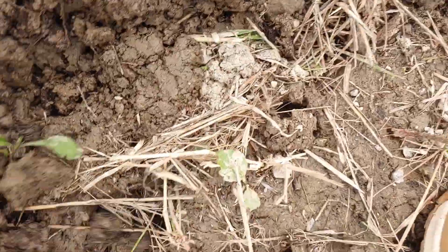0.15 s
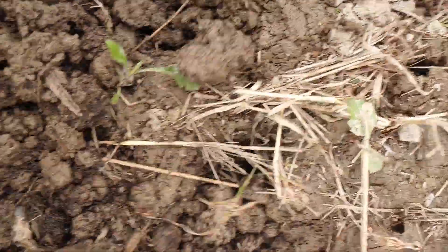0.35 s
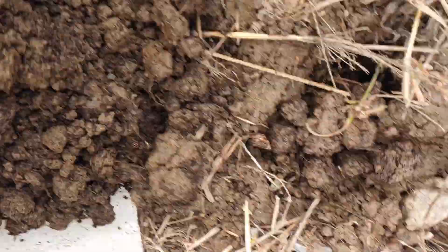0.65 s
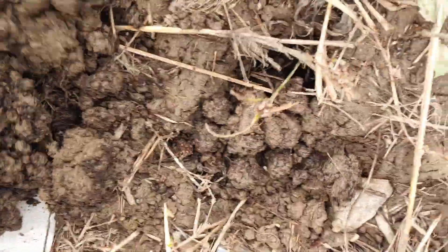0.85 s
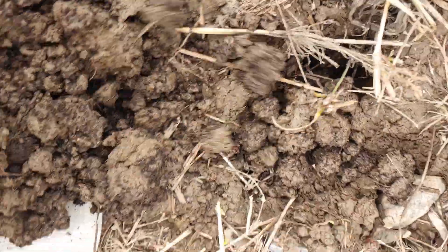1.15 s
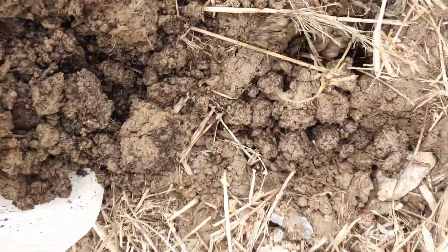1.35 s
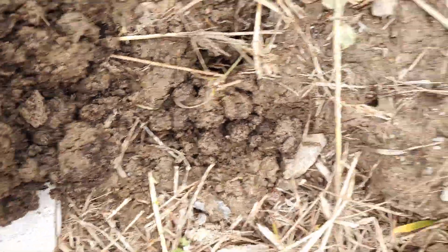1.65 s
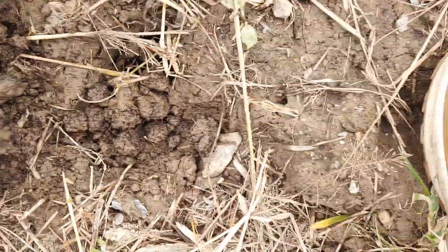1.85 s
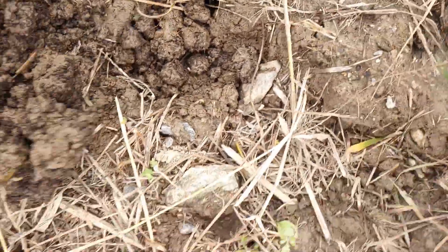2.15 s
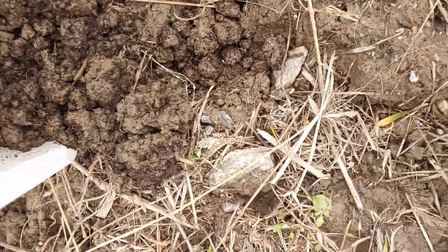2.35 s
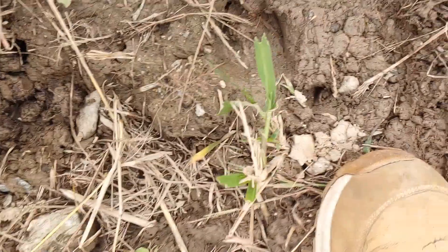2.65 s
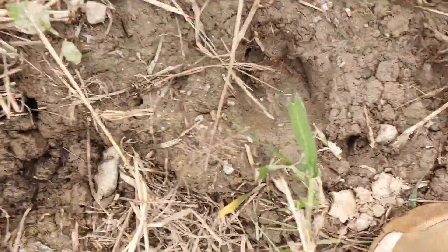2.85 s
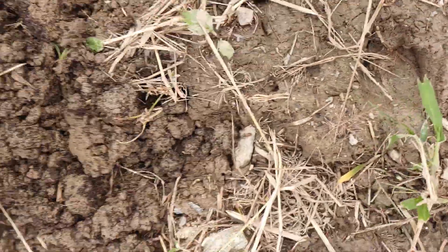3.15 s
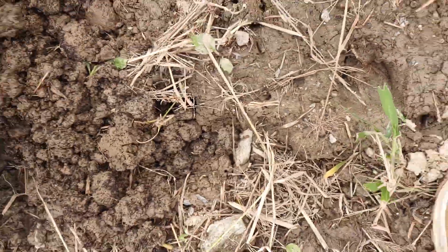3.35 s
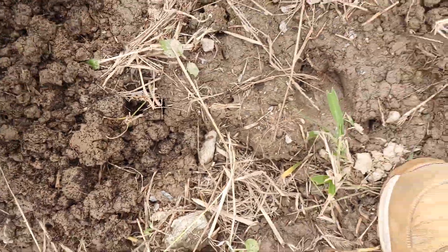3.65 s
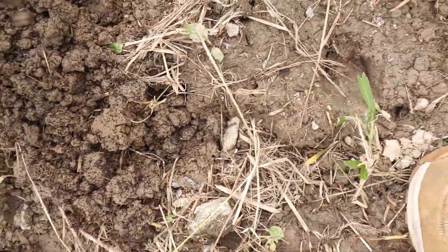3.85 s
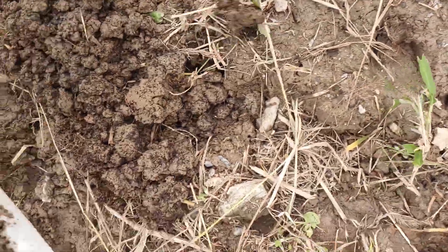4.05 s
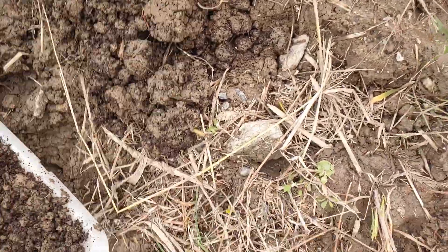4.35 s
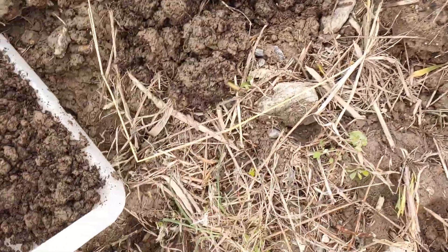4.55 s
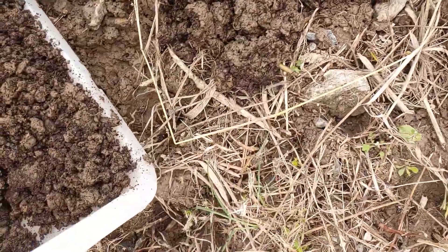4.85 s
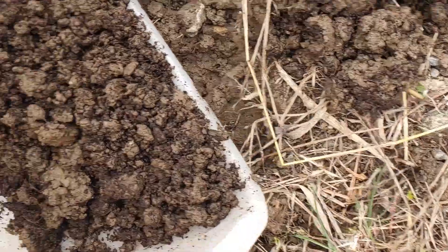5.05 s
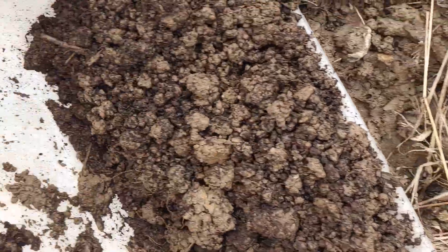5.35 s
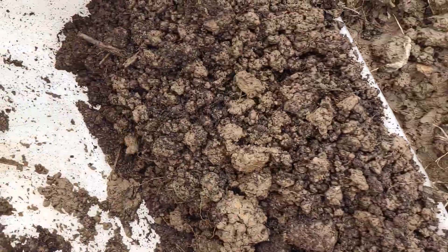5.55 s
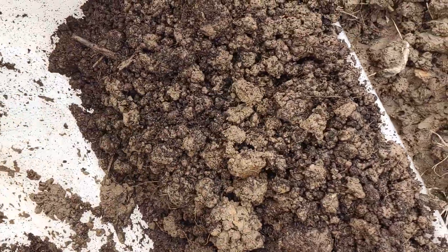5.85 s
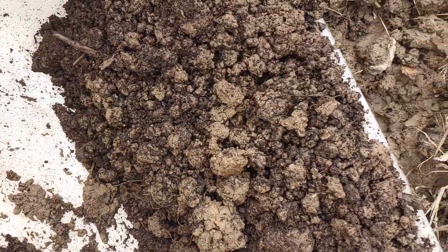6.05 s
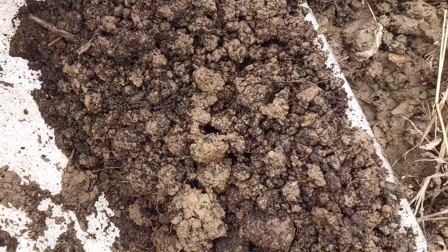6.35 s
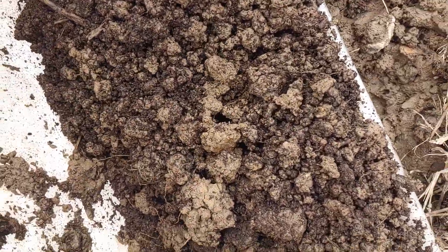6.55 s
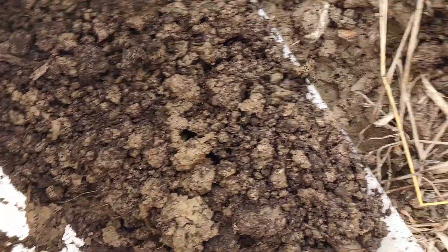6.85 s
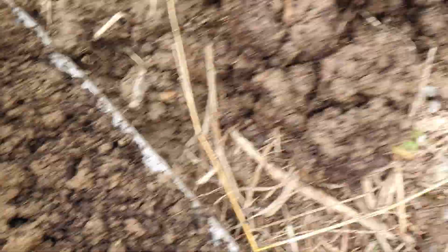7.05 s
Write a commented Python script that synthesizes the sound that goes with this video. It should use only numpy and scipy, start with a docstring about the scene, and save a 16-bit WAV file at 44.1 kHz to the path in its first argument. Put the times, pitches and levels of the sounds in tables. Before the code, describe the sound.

Soil is dug close to the microphone in an open field, over a faint hiss of air and insects. From the start, dry straw rustles in short irregular strokes, earth crumbles in tiny clicks and stalks snap. Clods land with low, dull thuds, loudest in a cluster around 1.4 seconds, and a foam tray nearby adds a slight hollow ring. A strong rustle comes at about 2.2 seconds and a sharp crack with a thump at 2.6. From 3 to 5.5 seconds the digging is lighter, with scattered scrapes, ticks and soft thuds. A small bird twitters faintly, far off to the right, from about 2.3 to 5.4 seconds. Cicadas drone thin and high, in turns, from 4 to about 6.4 seconds. Earth crumbles again from 5.5 seconds, with a few more thuds and straw crackles between 6.3 and 7.

```python
"""Digging in dry straw

Clods of soil are dug and tipped close by in a field, beside a foam tray that rings along.
Straw rustles and earth crumbles in showers of tiny clicks, stalks and clods crack, and lumps land
with low, sagging thuds. A small bird twitters far off to the right, and cicadas drone in turns,
their clicking membranes ringing a narrow body. A faint hiss of air and insects lies under it all."""
import sys
import numpy as np
from scipy import signal
from scipy.fft import rfft, irfft, next_fast_len
from scipy.io import wavfile
from scipy.ndimage import uniform_filter1d

SR = 44100
rng = np.random.default_rng(int(sys.argv[2]) if len(sys.argv) > 2 else 0)


def wav_record(signal):
    """Record a signal, one row per channel, as 16-bit PCM in the file named by sys.argv[1]."""
    frames = np.transpose(np.atleast_2d(signal))
    bounded = np.clip(frames, -1, 1)
    # unit amplitude maps onto the largest positive 16-bit level
    quanta = np.round(bounded * 32767).astype(np.int16)
    wavfile.write(sys.argv[1], SR, quanta)


N = 317515

# Tone curves of the background bed and the three digging textures. Each row: frequency in Hz, gain in dB.
FIELD_TONE = [(15, -61), (40, -2.5), (190, -15.5), (1300, -25.5), (2800, -30), (4000, -17), (5200, -29),
              (7300, -13), (9500, -33.5), (16000, -39)]
STRAW_TONE = [(1200, -23.5), (3200, 2.5), (5500, -1.5), (7300, 5.5), (10000, -7), (16000, -23)]
SOIL_TONE = [(150, -39), (300, -7.5), (750, -7), (1100, -4), (1900, -8), (4500, -45.5)]
GROUND_TONE = [(12, -30.5), (40, 4.5), (110, -3), (210, 2), (400, -22.5), (900, -55.5)]
# Digging strokes. Each row: middle in seconds, length in seconds, level in dB, straw over soil in dB.
STROKES = [(0.046, 0.27, -44.5, 4), (0.165, 0.12, -43, 16), (0.256, 0.22, -49, 5.5),
           (0.479, 0.26, -46.5, 10), (0.7, 0.15, -35.5, -0.5), (0.879, 0.17, -39.5, 0),
           (0.968, 0.065, -36, 1), (1.082, 0.13, -33, -2), (1.31, 0.11, -37.5, 4), (1.415, 0.093, -38.5, 4),
           (1.62, 0.19, -47, -11), (1.711, 0.11, -46, -3.5), (2.038, 0.22, -38.5, 0),
           (2.213, 0.12, -29.5, 7.5), (2.408, 0.2, -54.5, 7), (2.515, 0.16, -37, -2.5),
           (2.712, 0.18, -45.5, -0.5), (2.941, 0.08, -53, 4), (3.384, 0.17, -51.5, -1),
           (3.544, 0.062, -41.5, -2), (3.836, 0.035, -45.5, 1.5), (4.059, 0.049, -68, 32),
           (4.415, 0.079, -40, 8), (5.109, 0.19, -54, -5.5), (5.426, 0.16, -48.5, -6),
           (5.666, 0.15, -39, -6), (5.809, 0.08, -37.5, -9), (5.954, 0.075, -41, -6),
           (6.054, 0.046, -42.5, -1.5), (6.376, 0.042, -39.5, -19), (6.543, 0.18, -47, -3.5),
           (6.764, 0.23, -44, 6), (7.063, 0.15, -71, 24)]
# How much a stroke shakes the ground. Each row: time in seconds, rumble over soil in dB.
STROKE_DEPTH = [(0, 3), (2.0, 6.5), (2.22, -9), (5.13, -4.5), (5.45, -21)]
# The hollow of the foam tray. Each row: resonance in Hz, width in Hz, gain in dB.
TRAY_MODES = [(333, 450, 0), (721, 43, 5), (1057, 110, -3.5), (1500, 180, -4)]
# Stalks break high, clods low. Each row: time in seconds, level in dB, pitch in Hz.
SNAPS = [(0.179, -11.5, 6870), (0.2, -20.5, 7440), (0.348, -30, 7900), (0.37, -21, 7400),
         (0.551, -24, 5300), (0.5615, -8, 7460), (0.604, -31, 1500), (0.833, -27.5, 910),
         (0.9235, -25, 3200), (0.955, -30.5, 920), (1.191, -31, 1320), (1.2841, -18, 7500),
         (1.4162, -12, 1460), (1.4476, -18.5, 1690), (1.732, -26, 725), (1.9506, -23.5, 8000),
         (1.967, -19, 7900), (2.0805, -12, 1800), (2.1315, -16, 7200), (2.217, -14, 8600),
         (2.357, -37, 1030), (2.545, -36, 1500), (2.636, -8, 1800), (2.644, -10, 7070), (2.6505, -29, 6940),
         (2.699, -38.5, 2900), (3.398, -29.5, 1392), (3.554, -37, 1100), (3.8381, -31, 2170),
         (4.046, -30.5, 6600), (4.346, -39, 1003), (4.4019, -24, 3470), (4.413, -20, 3360),
         (4.5065, -37.5, 1240), (4.647, -39.5, 1330), (4.7, -43, 1090), (4.808, -52.5, 820),
         (4.9254, -38.5, 1260), (5.079, -41, 1230), (5.636, -32.5, 1500), (6.054, -36, 1330),
         (6.1514, -19, 7380), (6.347, -42, 1300), (6.365, -35.5, 800), (6.386, -37, 1100),
         (6.4744, -25.5, 1500), (6.537, -38.5, 1270), (6.714, -31, 3360), (6.772, -26, 6560),
         (6.973, -44.5, 1310), (7.0168, -27.5, 4240), (7.086, -37, 3930), (7.108, -34.5, 4440)]
# Lumps landing. Each row: start in seconds, level in dB, pitch in Hz, seconds to fade by 60 dB.
THUDS = [(0.287, -26.5, 111, 0.14), (0.336, -20, 122, 0.23), (0.512, -24, 58, 0.14),
         (0.892, -17, 158, 0.16), (0.968, -18.5, 128, 0.1), (1.205, -16.5, 128, 0.095),
         (1.348, -6.5, 143.4, 0.18), (1.37, -14.5, 177, 0.23), (1.401, -2.5, 90, 0.11),
         (1.436, -2, 117, 0.094), (1.641, -22, 180, 0.036), (2.004, -17, 93, 0.079),
         (2.075, -13.5, 90, 0.072), (2.205, -16, 170.4, 0.066), (2.423, -28, 134, 0.1),
         (2.635, -1, 168, 0.076), (2.929, -31.5, 158.6, 0.18), (3.81, -34.5, 208, 0.11),
         (3.834, -32, 417, 0.094), (3.909, -22.5, 98.7, 0.15), (4.414, -29, 306, 0.099),
         (4.447, -39, 43.7, 0.41), (4.647, -30.5, 172, 0.078), (4.897, -40.5, 259, 0.11),
         (5.13, -35.5, 146, 0.17), (5.188, -30, 95.4, 0.096), (5.575, -30.5, 78.4, 0.35),
         (6.363, -16.5, 182, 0.094), (6.472, -13, 116.5, 0.11), (6.79, -23, 203, 0.1),
         (6.847, -24, 140.3, 0.16)]
# Runs of bird notes. Each row: start in seconds, end in seconds, level in dB.
TWITTERS = [(2.284, 2.56, -50), (3.29, 3.36, -57), (3.5, 3.9, -56), (4.16, 4.29, -61.5), (4.575, 4.91, -60),
            (5.022, 5.09, -57)]
# The bird's steady notes. Each row: start in seconds, length in seconds, level in dB, pitch in Hz.
HELD_NOTES = [(3.161, 0.13, -63.5, 4070), (5.297, 0.074, -51.5, 3800)]
# Cicada calls. Each row: start in seconds, end in seconds, level in dB, pitch in Hz.
CICADA_CALLS = [(3.999, 4.549, -52, 7850), (4.495, 5.501, -51, 7430), (5.901, 6.354, -59.5, 7840)]
# Where the digging lies. Each row: time in seconds, left over right in dB.
DIGGING_PAN = [(1.9, -4.5), (2.3, -5), (3.39, -6), (3.602, -5.5), (6.9, -3.5), (7.019, -16.5)]
# Stereo tilt on top of that pan. Each row: frequency in Hz, left over right in dB.
STEREO_TILT = [(100, 12.5), (700, 9.5), (2500, 0.5), (8000, 10), (14000, 23.5)]


def amp(db):
    return 10 ** (np.asarray(db) / 20)


def unit_rms(x):
    return x / np.sqrt(np.mean(x ** 2) + 1e-20)


def equalise(x, curve):
    """Shapes the tone with (Hz, dB) points joined on a log axis."""
    points_hz, db = np.transpose(curve)
    size = next_fast_len(N)
    hz = np.fft.rfftfreq(size, 1 / SR)
    gain = amp(np.interp(np.log(hz + 1), np.log(points_hz + 1), db))
    return irfft(rfft(x, size) * gain, size)[..., :N]


def add(mix, start, sound, pan_db=0):
    """Lays a sound into the mix; a positive pan leans left."""
    part = mix[:, round(start * SR):][:, :sound.shape[-1]]
    part += sound[..., :part.shape[1]] * amp([[pan_db / 2], [-pan_db / 2]])


def resonate(x, hz, width_hz):
    """A resonance: shifts the pitch down to zero, smooths, and shifts back."""
    turn = np.exp(2j * np.pi * np.cumsum(np.full(len(x), hz)) / SR)
    pole = np.exp(-np.pi * width_hz / SR)
    return 2 * (turn * signal.lfilter([1 - pole], [1, -pole], x / turn + 1e-18)).real


def drift(seconds, count=1):
    """Random curves that wander on the given time scale."""
    steps = rng.standard_normal((count, N // 64 + 2))
    slow = unit_rms(uniform_filter1d(steps, max(int(seconds * SR / 64), 2), axis=1))
    return np.repeat(slow, 64, axis=1)[:, :N]


def field_bed():
    """Distant insects, air and microphone hiss, wavering slightly."""
    level_db = -60 + 2.5 * drift(0.068)
    return amp(level_db) * unit_rms(equalise(rng.standard_normal((2, N)), FIELD_TONE))


def grains(tone, per_s, spread_db, band_hz, q, clump_db, clump_s, spell_db, spell_s, shared):
    """Clumps of clicks ring bits of many pitches; each pitch has its own loud and quiet spells."""
    pitches = np.geomspace(*band_hz, 24)
    sizes = amp(spread_db * np.minimum(rng.exponential(1, (2, N)), 4))
    clicks = sizes * rng.choice([-1, 1], (2, N)) * (rng.random((2, N)) < per_s / SR)
    bit = rng.integers(0, len(pitches), (2, N))
    spells = np.take_along_axis(drift(spell_s, len(pitches)), bit, axis=0)
    clicks *= amp(spell_db * spells + clump_db * drift(clump_s))
    left, other = sum(signal.lfilter(*signal.iirpeak(hz, q, SR), clicks * (bit == k))
                      for k, hz in enumerate(pitches))
    right = shared * left + np.sqrt(1 - shared ** 2) * other
    return unit_rms(equalise(np.array([left, right]), tone))


def digging():
    """Each stroke swells and fades; straw, soil and ground answer it with their own grain."""
    straw = grains(STRAW_TONE, per_s=16000, spread_db=1.7, band_hz=(1200, 14300), q=24,
                   clump_db=2.8, clump_s=0.012, spell_db=5.5, spell_s=0.05, shared=0.1)
    soil = grains(SOIL_TONE, per_s=8000, spread_db=2.5, band_hz=(300, 4500), q=18,
                  clump_db=3.6, clump_s=0.016, spell_db=6, spell_s=0.05, shared=0.5)
    soil = unit_rms(soil + 0.65 * np.array([foam_tray(side) for side in soil]))
    ground = grains(GROUND_TONE, per_s=400, spread_db=1.7, band_hz=(31, 400), q=3.5,
                    clump_db=4.8, clump_s=0.03, spell_db=7.04, spell_s=0.058, shared=0.96)
    t = np.arange(0, N + 64, 64) / SR
    middle, length, soil_db, straw_db = np.transpose(STROKES)
    swells = np.exp(-abs((t[:, None] - middle) / (0.33 * length)) ** 1.88)
    ground_db = soil_db + np.interp(middle, *np.transpose(STROKE_DEPTH))
    # The ground rumbles on after each thud, softer and longer than the blow.
    landed, thud_db, _, t60 = np.transpose(THUDS)
    age = t[:, None] - landed
    tails = (age > 0) * amp(-60 * abs(age) / (2.18 * t60))
    straw_power = swells @ amp(soil_db + straw_db) ** 2
    soil_power = swells @ amp(soil_db) ** 2
    ground_power = swells @ amp(ground_db) ** 2 + tails ** 2 @ amp(thud_db - 14) ** 2
    layers = (straw, straw_power), (soil, soil_power), (ground, ground_power)
    return sum(layer * np.interp(np.arange(N) / SR, t, np.sqrt(power)) for layer, power in layers)


def foam_tray(x):
    """The tray rings along with whatever scrapes or strikes near it."""
    return sum(amp(db) * resonate(x, hz, width) for hz, width, db in TRAY_MODES)


def snaps():
    """A stalk or clod strains, then breaks: a sharp crack, a short ring and a dull knock."""
    mix, t = np.zeros((2, N)), np.arange(-400, 2200) / SR
    strain = np.where(t < 0, 0.7 * np.exp(t / 0.001) + 0.07 * np.exp(t / 0.006), 1)
    for time, db, hz in SNAPS:
        octaves = np.log2(hz / 1000)
        age = np.maximum(t, 0) / 1.354 ** octaves  # clods crack short, stalks splinter longer
        decay = np.exp(-age / 0.0015) + 0.12 * np.exp(-age / 0.005)
        noise = rng.standard_normal((3, len(t)))
        crack = (noise[0] + 1.6 * noise[:2]) * strain * decay
        ring = np.array([resonate(side, hz, width_hz=610) for side in crack])
        ring += 0.3 * signal.lfilter(*signal.iirpeak(hz, 0.8, SR), crack)
        knock = foam_tray(noise[2] * (t > 0) * np.exp(-age / 0.009))
        knock_db = -8 - 18 * octaves  # higher breaks knock less
        snap = ring / abs(ring).max() + amp(knock_db) * knock / abs(knock).max()
        snap[1] = np.roll(snap[1], rng.integers(-7, 6))  # each spot has its own stereo delay
        add(mix, time + t[0], amp(db) * snap)
    return equalise(mix, [(300, 8.5), (8000, 7.0), (16000, -18.5)])


def thuds():
    """A lump lands on soft earth: a damped swing that sags in pitch, and a rough burst as it breaks."""
    mix, t = np.zeros((2, N)), np.arange(SR // 3) / SR
    sag = 0.0036 * (1 - np.exp(-t / 0.0058))
    for start, db, hz, t60 in THUDS:
        swing = np.sin(2 * np.pi * hz * (t + sag)) * amp(-60 * t / t60)
        # The ground below answers lower and longer.
        deep = 0.28 * np.sin(2 * np.pi * 0.61 * hz * t) * amp(-35 * t / t60)
        noise = rng.standard_normal(len(t))
        grit = resonate(resonate(noise, 2.1 * hz, 330), 2.1 * hz, 330)
        burst = 0.39 * unit_rms(grit) * np.exp(-t / 0.0089)
        attack = 1 - np.exp(-(t / (0.044 * t60)) ** 2)
        add(mix, start, amp(db) * attack * (swing + deep + burst))
    return mix


def bird():
    """Runs of faint falling whistles, no two alike, and a few steady notes, blurred by distance."""
    mix, gap_s = np.zeros((2, N)), 0.0665
    notes = [(*row, 0) for row in HELD_NOTES]
    for first, last, db in TWITTERS:
        beats = np.arange(first, last + gap_s / 2, gap_s)
        for beat, (high, steep, loud) in zip(beats, rng.standard_normal((12, 3))):
            notes.append((beat - 0.015, 0.052, db + 2.2 * loud, 4300 + 80 * high, 700 + 220 * steep))
    for start, length, db, hz, fall_hz in notes:
        t = np.arange(0, length, 1 / SR)
        blur = 1 + 0.9 * unit_rms(uniform_filter1d(rng.standard_normal(len(t)), 160))
        pitch = hz - fall_hz * (t / length) ** 2
        whistle = np.sin(2 * np.pi * np.cumsum(pitch) / SR) * np.hanning(len(t))
        add(mix, start, amp(db) * blur * whistle, pan_db=-8)
    return mix


def cicadas():
    """Membrane clicks, smeared into a throbbing noise, ring a narrow body."""
    mix, clicks_per_s = np.zeros((2, N)), 145
    for start, end, db, hz in CICADA_CALLS:
        t = np.arange(start, end, 1 / SR)
        throb = 0.15 + np.cos(np.pi * clicks_per_s * t) ** 4
        drive = rng.standard_normal((2, len(t))) * throb
        body = np.array([resonate(resonate(side, hz, 310), hz, 310) for side in drive])
        add(mix, start, amp(db) * unit_rms(body) * signal.windows.tukey(len(t), 0.3), pan_db=3)
    return mix


def scene():
    """Pans and tilts the close digging, then sets it against the sounds of the field."""
    close = digging() + snaps() + thuds()
    pan_db = np.interp(np.arange(N) / SR, *np.transpose(DIGGING_PAN))
    close *= amp([pan_db / 2, -pan_db / 2])
    left = equalise(close[0], np.array(STEREO_TILT) * [1, 0.5])
    right = equalise(close[1], np.array(STEREO_TILT) * [1, -0.5])
    right = np.roll(right, 15)  # the digging reaches the right side 15 samples later
    return np.array([left, right]) + cicadas() + bird() + field_bed()


def record(dry):
    """Soft clipping rounds the loudest blows, and a steep low-pass trims the very top."""
    ceiling, cutoff_hz = 0.97, 16450
    rounded = ceiling * np.tanh(dry / ceiling)
    lowpass = signal.firwin(511, cutoff_hz, window=("kaiser", 9), fs=SR)
    return signal.oaconvolve(rounded, lowpass[None], "same")


dry = scene()
out = record(dry)
wav_record(out)
```